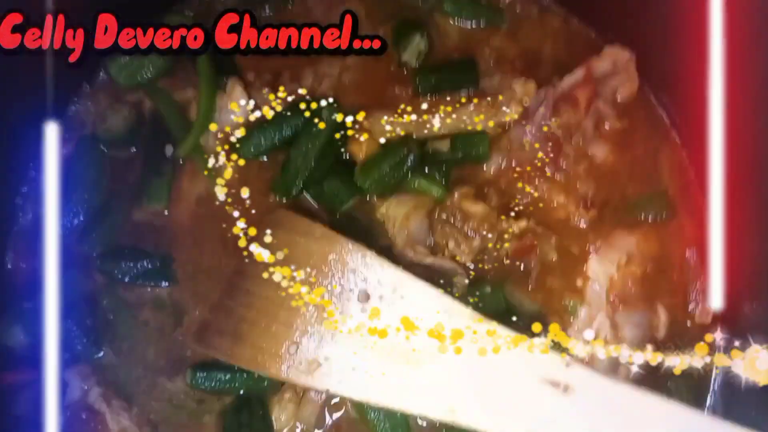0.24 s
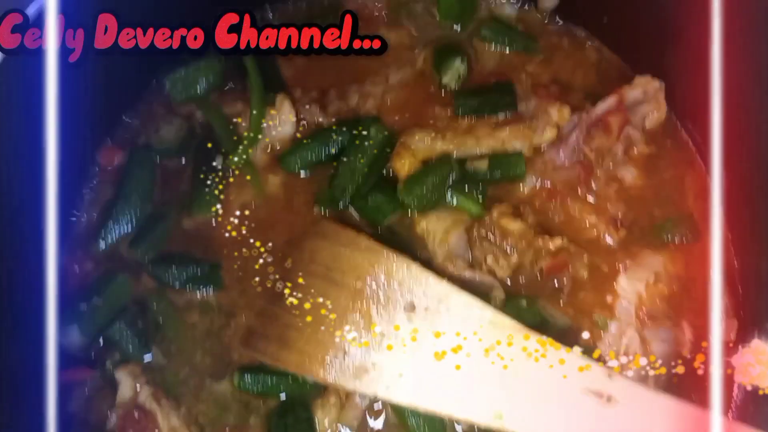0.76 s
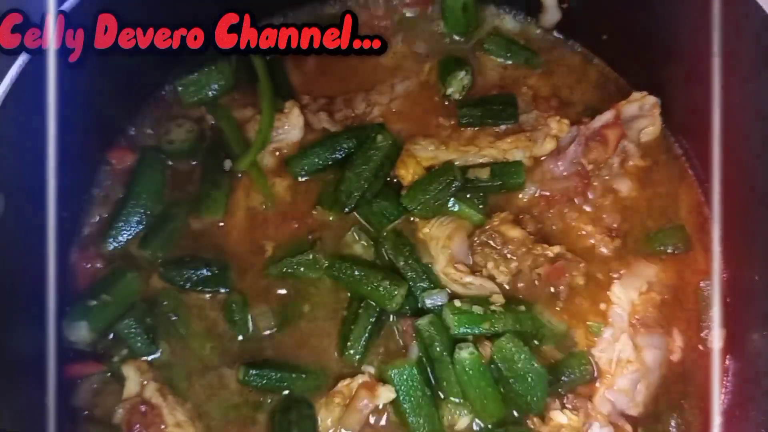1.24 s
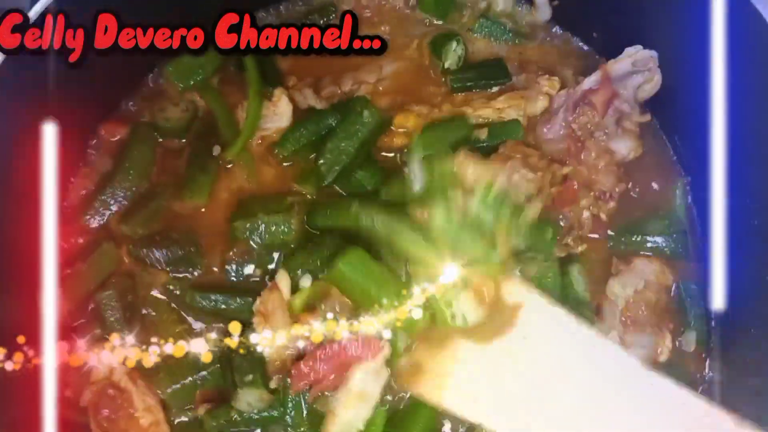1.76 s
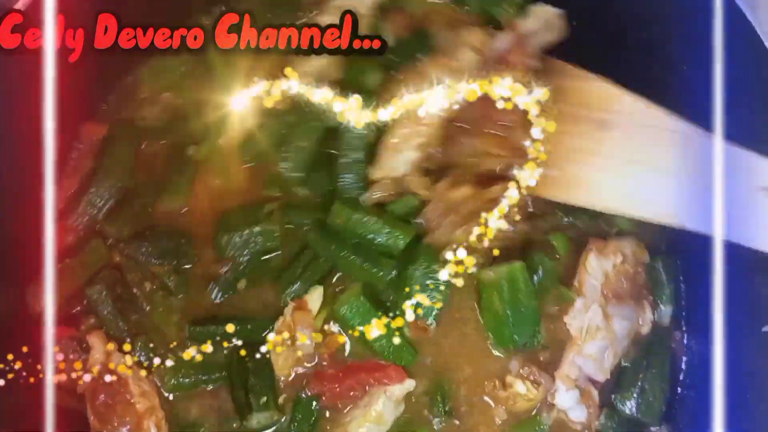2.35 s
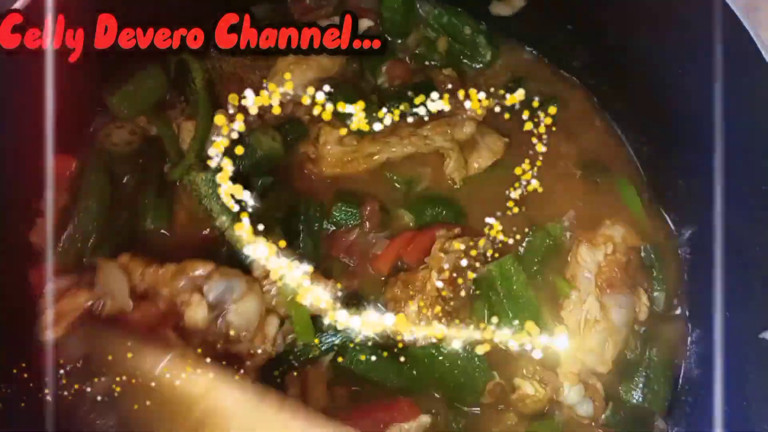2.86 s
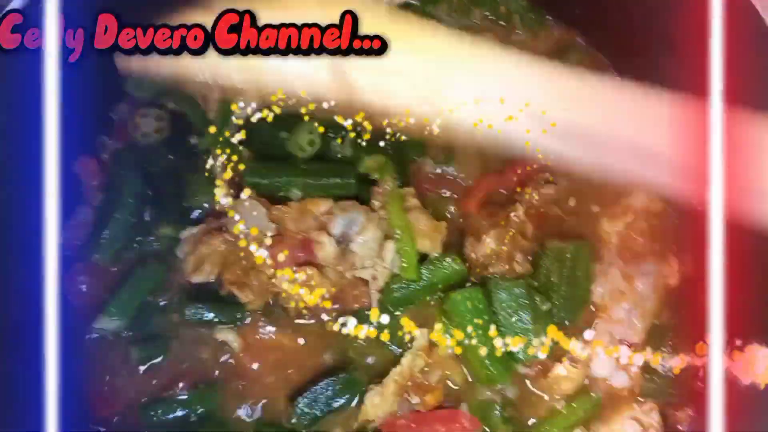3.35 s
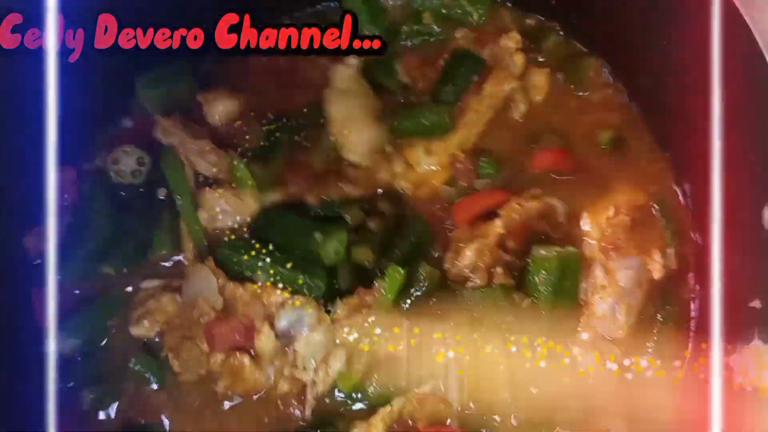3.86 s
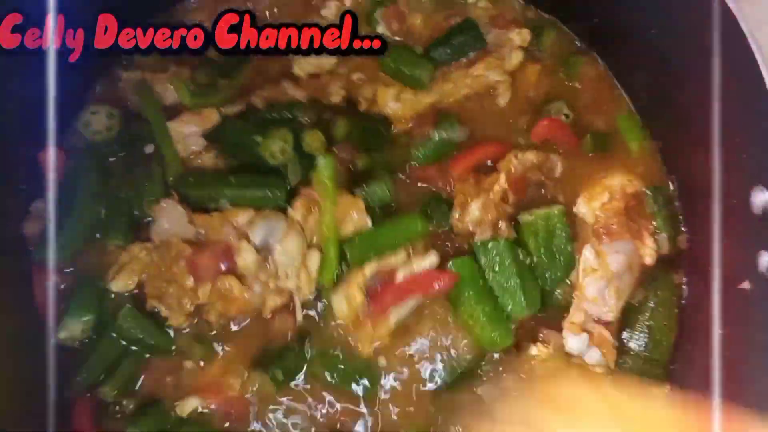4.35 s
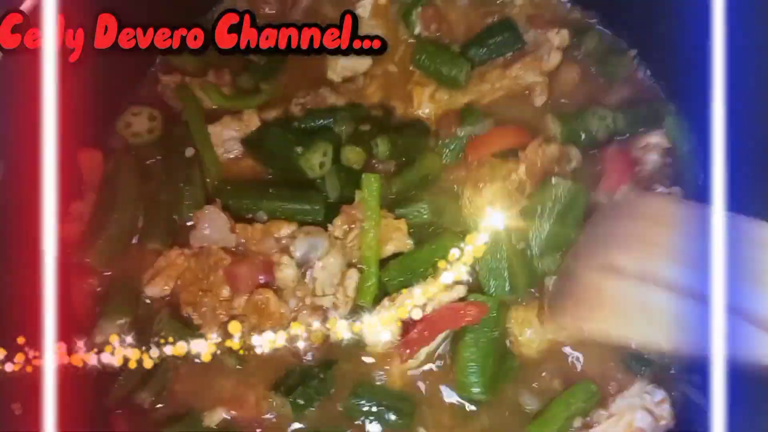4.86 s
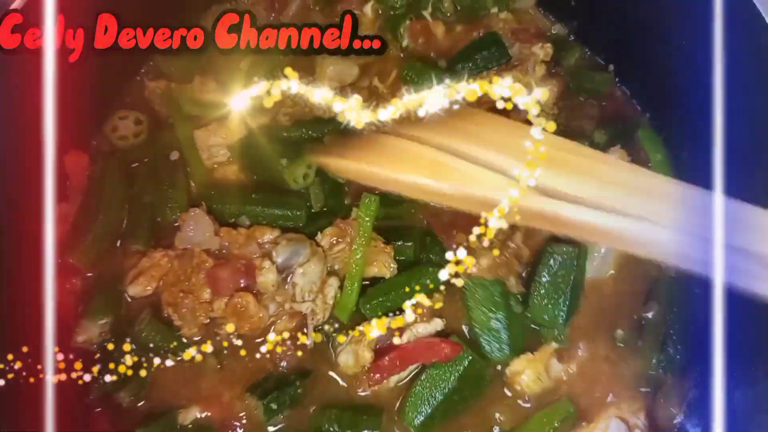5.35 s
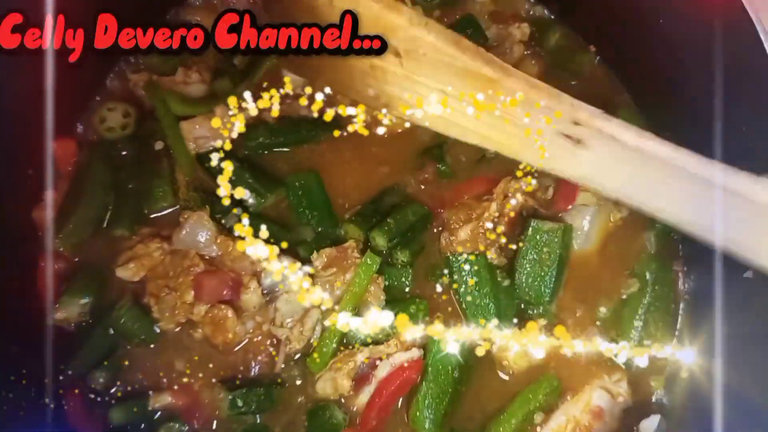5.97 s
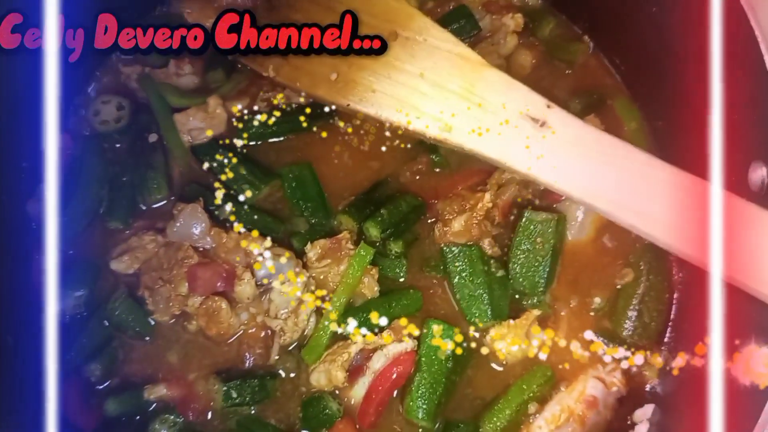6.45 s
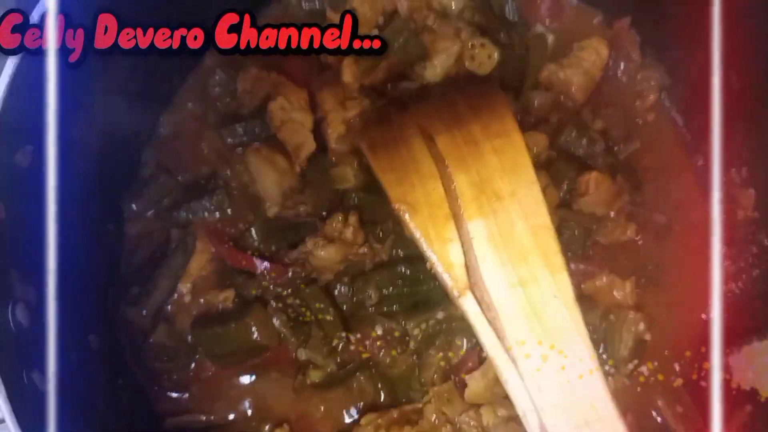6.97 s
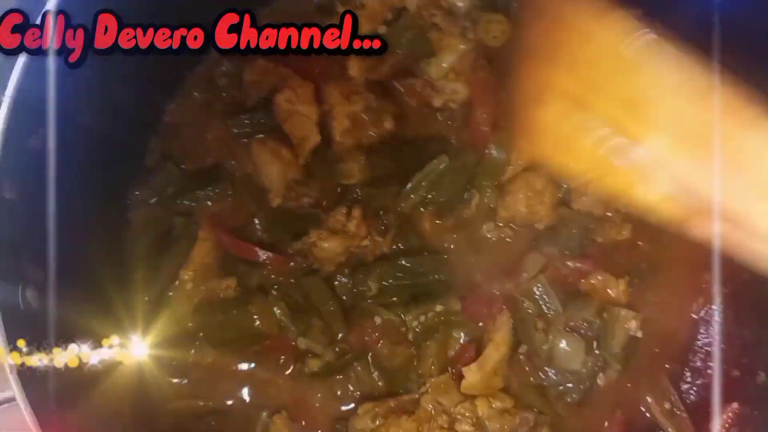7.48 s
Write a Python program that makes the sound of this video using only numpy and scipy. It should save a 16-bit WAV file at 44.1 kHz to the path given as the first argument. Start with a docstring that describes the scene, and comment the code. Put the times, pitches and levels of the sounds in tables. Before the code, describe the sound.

Wooden blade against a metal pot: dry, short knocks and brief rubbing drags, loudest early on, softer single taps midway and another cluster later. Faint simmer, fizz and swelling low hum continue beneath, with little sauce pops. After a momentary silence, a fuller bubbling, sizzling boil follows without strong knocks. Close microphone, slightly dull treble, short room tail.

```python
"""A wooden spatula knocks and drags on the wall of a metal pot of stew: blows ring the pot's modes as damped
sines with a contact noise and a short kitchen tail, and drags are rubbing noise through broadened modes.
The sauce spits in pings and puffs; burner hiss with narrow resonances, a fizz and a wavering, swelling low hum
lie beneath. Near the end the sound is cut briefly and fades back in on a harder boil of noise and bubble grains,
with faint, thin high flickers at the times of the late spits."""
import sys
import numpy as np
from scipy import signal
from scipy.fft import rfft, irfft, next_fast_len
from scipy.io import wavfile
from scipy.ndimage import uniform_filter1d, map_coordinates

SR = 44100
rng = np.random.default_rng(int(sys.argv[2]) if len(sys.argv) > 2 else 0)


def bounce(signal):
    """Save signal as a 16-bit WAV file at the path given by the first command-line argument."""
    frames = np.transpose(np.atleast_2d(signal))
    limited = np.clip(frames, -1, 1)
    pcm = np.round(limited * 32767).astype(np.int16)
    wavfile.write(sys.argv[1], SR, pcm)


N = 340452

# Blows, as a spectral tilt that weights modes and contact noise: (time [s], level at centre [dB],
# centre [Hz], loss below [dB/octave], loss above [dB/octave], ringing freedom [factor on t60],
# second emphasis level [dB], second emphasis centre [Hz])
BLOW_EVENTS = [(0.5303, -56.5, 2250, 0.1, 11, 0.56, -53, 516),
               (1.3828, -22.5, 2290, 4.5, 16.8, 0.35, -33, 940),
               (1.4214, -33, 450, 6.7, 6.5, 0.31, -42, 4200), (1.438, -45, 800, 22, 22, 0.47, -55, 290),
               (1.6569, -56, 750, 15, 17, 0.33, -60, 290), (2.0124, -51, 2770, 49, 35, 1.8, -74, 5100),
               (2.053, -28.5, 2090, 22.4, 34, 0.36, -35.5, 6320),
               (2.1334, -33.5, 1280, 0.1, 9.9, 0.25, -19, 396),
               (2.1363, -22, 2240, 17, 13.6, 0.4, -22, 767), (2.514, -33, 725, 31, 15.7, 0.61, -49.5, 2280),
               (2.73, -50.5, 1630, 26, 35, 0.74, -70, 2250), (2.7543, -54.5, 1420, 24, 21, 1.2, -68, 2250),
               (4.131, -41.5, 290, 0.1, 20, 1.1, -53, 520), (4.549, -30.5, 570, 17.6, 8.4, 0.93, -28, 1170),
               (4.691, -42, 288, 0.1, 31, 0.3, -65, 597), (6.155, -39, 1220, 0.1, 10.6, 0.94, -29.5, 645),
               (6.1947, -43.5, 700, 15, 17, 1.4, -68, 4500), (6.221, -31, 3760, 0.11, 45, 0.89, -24, 673),
               (6.2672, -32.5, 666, 56, 13, 0.48, -52, 4260),
               (6.8493, -70, 1316, 1.8, 12.6, 0.3, -55.5, 288)]
# Modes of pot wall and spatula blade: (frequency [Hz], relative level [dB], t60 at freedom 1 [s])
POT_MODES = [(295.8, -13, 0.15), (310.6, -6, 0.3), (420, -7.5, 0.042), (475, -11, 0.2), (520, 0.5, 0.08),
             (624, -1, 0.06), (697, -1, 0.056), (839, -10.5, 0.11), (877, -27, 0.021), (1096, -9.5, 0.12),
             (1260, -8.5, 0.043), (1517, -10, 0.11), (1640, -13.5, 0.038), (2118, 7.5, 0.042),
             (2247, 10.5, 0.023), (2500, -2.5, 0.064), (2790, -13, 0.32), (3210, -5, 0.031),
             (3320, -10, 0.061), (3590, -13, 0.12), (3650, -0.5, 0.065), (4316, 2, 0.051),
             (4448, 12, 0.065), (4990, 9, 0.035), (5680, 5, 0.077), (6460, -6, 0.12), (7020, 5, 0.059)]
# Drags of the blade; a row whose end lies before its build-up is silent: (time of firmest contact [s],
# level [dB], build-up [s], fade [dB/s], high band relative to low [dB], time of end [s])
DRAG_EVENTS = [(0.546, -61.5, 0.27, 213, -10, 0.84), (1.39, -39.5, .004, 170, -11, 1.66),
               (2.059, -60, .004, 220, -2, 2.12), (2.149, -45.5, .004, 236.5, -6.5, 1.9),
               (3.59, -60.5, .03, 150, -5.5, 3.63), (4.576, -51.5, .02, 92.5, -4.5, 4.7),
               (4.875, -65.5, 0.0089, 78, -6, 5), (6.245, -44.5, 0.058, 156, -27, 6.43)]
# Sauce spits: (time [s], nominal ping level [dB], frequency [Hz])
SPIT_EVENTS = [(0.5012, -50, 3170), (1.6087, -59.5, 4850), (2.8527, -49, 5060), (3.0677, -52.5, 3500),
               (3.5938, -45.5, 4900), (3.9125, -58.5, 3020), (3.9707, -52.5, 5150), (4.0416, -62, 4200),
               (4.1902, -52, 2970), (4.687, -51.5, 4040), (4.8685, -53, 3990), (5.66, -60, 4220),
               (6.2994, -48, 3400), (6.404, -56.5, 4970), (6.4164, -56.5, 4930), (6.5775, -53.5, 4720),
               (6.953, -55.5, 3310), (7.001, -53.5, 4660), (7.051, -55, 5200), (7.144, -50.5, 5440),
               (7.2614, -56, 5640), (7.3355, -54, 3360), (7.4502, -52, 5630), (7.4764, -51, 5800),
               (7.584, -53, 4100)]
# Simmer levels: (time [s], hiss level [dB], fizz level [dB])
SIMMER_LEVELS = [(0.0, -62, -68), (1.03, -66, -72), (2.33, -63, -68.5), (2.56, -64.5, -70),
                 (5.92, -67, -74), (6.26, -62.5, -69), (6.58, -65.5, -71.5), (6.75, -67.5, -72)]
# Noise colours of burner hiss and of small bubbles: (frequency [Hz], relative level [dB])
HISS_SPECTRUM = [(88, -17), (150, 0), (260, -8.5), (382, -5), (444, -11), (516, -7.5), (769, -10.5),
                 (835, -10), (1390, -16.5), (2340, -9.5), (2880, -17), (4000, -27), (5200, -51),
                 (8800, -120)]
FIZZ_SPECTRUM = [(1760, -53.5), (3000, -7), (3290, -10), (3570, -4.5), (4200, 0), (4550, -6), (5040, 1.5),
                 (5950, -1.5), (7900, -8.5), (10300, 4.5), (17400, -120)]
# Resonances of the pot in the hiss: (frequency [Hz], full width at half amplitude [Hz], added gain [dB])
HISS_RIDGES = [(534, 6.1, 8), (821, 4.1, 15), (1560, 60, -2.5), (1776, 350, 0), (2084, 26, 5),
               (2040, 1.9, 3), (2331, 55, 5.5)]
# Noise colour of the low rumble in the hum: (frequency [Hz], relative level [dB])
HUM_SPECTRUM = [(15, -60), (25, -35.5), (48, -9.5), (80, -3), (98, -4), (119, 6), (161, -7.5), (202, -5),
                (260, -32), (340, -77), (570, -120)]
# Swells of the hum: (time of peak [s], peak tone level [dB], full width at 1/e [s])
HUM_SWELLS = [(0.123, -67, 0.18), (0.52, -58, 0.077), (0.675, -68, 0.15), (1.055, -59, .1),
              (1.403, -55, 0.086), (1.773, -60, 0.094), (2.1, -70, 0.055), (2.275, -61, 0.33),
              (2.803, -59, 0.13), (3.293, -69.5, .5), (3.84, -65, 0.19), (4.214, -59.5, 0.13),
              (4.59, -60, 0.089), (4.948, -62.5, 0.14), (5.138, -63, 0.049), (5.517, -63.5, 0.068),
              (6.011, -68, .2), (6.23, -58.5, 0.12), (6.378, -62.5, 0.2), (6.588, -62, 0.052)]
# Hard boil levels: (time [s], rumble level [dB], bubble level [dB], sizzle level [dB])
BOIL_LEVELS = [(6.82, -75.5, -76.5, -77), (6.9, -77.5, -76, -78.5), (6.98, -54, -62.5, -65.5),
               (7.16, -53.5, -56, -61.5), (7.25, -55, -62, -67.5), (7.38, -54.5, -55.5, -55),
               (7.47, -55.5, -63.5, -65), (7.56, -59.5, -65.5, -57), (7.67, -49.5, -61.5, -66.5),
               (7.72, -59, -60, -65.5)]
# Noise colours of the hard boil, low to high: (frequency [Hz], relative level [dB])
RUMBLE_SPECTRUM = [(18, -60), (30, -34), (80, -15), (105, -2), (140, 5), (174, -2.5), (400, -12.5),
                   (520, -64), (880, -120)]
BURBLE_SPECTRUM = [(180, -19.5), (300, -14), (742, -11.5), (809, -10.5), (1380, -20), (1590, -18),
                   (2000, -23.5), (2600, -88), (4400, -120)]
SIZZLE_SPECTRUM = [(820, -42), (1400, -28.5), (1620, -3), (1780, -16), (1860, -26), (2040, -17), (2210, -8),
                   (2770, -13.5), (3310, -4.5), (3940, -14), (5500, -8.5), (7900, -18.5), (10300, -7),
                   (17400, -120)]
# Decay of the room: (frequency [Hz], t60 [s])
KITCHEN_DECAY = [(200, 0.54), (1000, 0.16), (4000, 0.31), (9000, 0.22)]
# Treble roll-off of the microphone: (frequency [Hz], gain [dB])
MIC_RESPONSE = [(5500, 0), (7750, -4), (8050, -15), (9500, -26), (15000, -38)]
# Noise colour of the self-noise: (frequency [Hz], relative level [dB])
SELF_NOISE_SPECTRUM = [(6500, -12), (8300, 7), (9500, 3), (10500, 0), (13500, -1.5), (15000, 1.5)]

SELF_NOISE_DB, TOP_HZ = -97, 15750
CUT_START_S, CUT_END_S = 6.757, 6.82
FLICKER_HZ, FLICKER_UNDER_SPIT_DB = 9130, 13.5  # mean frequency; level below the spit's table level
SECOND_LOSS_DB_PER_OCTAVE = 33.5  # on both sides of a blow's second emphasis
DRAG_END_S = 0.011  # ramp at the end of a drag
PUSH, GRIT = 4.8, 0.97  # contact: one impulse of the blade and the noise around it


def amp(db):
    """Logarithmic level: amplitude gain of a level in dB."""
    return 10 ** (np.asarray(db) / 20)


def unit(x):
    """Mean-square normalisation: x at rms 1."""
    return x / np.sqrt(np.mean(x ** 2) + 1e-20)


def along(points, hz):
    """Logarithmic frequency scale: (frequency, value) points interpolated on it."""
    f, v = np.transpose(points)
    return np.interp(np.log(hz + 1), np.log(f + 1), v)


def curves(rows, outside=-140):
    """Piecewise-linear levels in dB: one curve per column, practically silent outside the table."""
    s, *columns = np.transpose(rows)
    return [np.interp(np.arange(N) / SR, s, c, outside, outside) for c in columns]


def filtered(x, response):
    """Linear filtering: the spectrum of x times a response of frequency."""
    m = next_fast_len(len(x) + 8192)
    return irfft(rfft(x, m) * response(np.fft.rfftfreq(m, 1 / SR)), m)[:len(x)]


def patchy(depth_db):
    """Modulated noise: white noise with time-frequency patches of random gain."""
    z = signal.stft(rng.standard_normal(N + 512), nperseg=512)[2]
    field = rng.standard_normal(z.shape)
    field = uniform_filter1d(field, size=6, axis=0)
    field = uniform_filter1d(field, size=10, axis=1)
    return signal.istft(z * amp(depth_db * unit(field)), nperseg=512)[1][:N]


def shaped(x, spectrum):
    """Spectral colouring: x weighted by a spectrum, rms 1."""
    return unit(filtered(x, lambda hz: amp(along(spectrum, hz))))


def grains(count, hz, spread, cycles, size_db):
    """Bubble oscillation: random damped sines whose pitch rises as if nearing the surface; rms 1."""
    when, pitch, size = rng.random(count), rng.standard_normal(count), rng.standard_normal(count)
    f = (hz * np.exp(spread * pitch))[:, None]
    u = f * np.arange(int(3 * cycles * SR / hz)) / SR / cycles  # age in units of `cycles` periods
    envelope = amp(size_db * size)[:, None] * u * np.exp(-3 * u)
    wave = envelope * np.sin(2 * np.pi * cycles * u * (1 + 0.2 * u / cycles))
    wave *= f < SR / 3
    at = (when * N).astype(int)[:, None] + np.arange(u.shape[1])
    return unit(np.bincount(at.ravel(), wave.ravel(), N)[:N])


def add_at(out, s, sound):
    """Superposition: adds a sound to out from time s."""
    out[round(s * SR):][:len(sound)] += sound


def hum():
    """Frequency and amplitude modulation: a wavering low tone swells unevenly over a steady rumble."""
    t = np.arange(N) / SR
    # random points 12 times a second, joined smoothly
    waver = map_coordinates(rng.standard_normal(N * 12 // SR + 4), [np.arange(N) * 12 / SR])
    tone = np.sqrt(2) * np.sin(2 * np.pi * np.cumsum(119 + 7 * waver) / SR)
    rumble = shaped(rng.standard_normal(N), HUM_SPECTRUM)
    swell = sum(amp(db) * np.exp(-(2 * (t - s) / length) ** 2) for s, db, length in HUM_SWELLS)
    steady = amp(-70.5) * shaped(patchy(depth_db=2.5), HUM_SPECTRUM)
    return (swell * (tone + .5 * rumble) + steady) * (t < CUT_END_S)


def simmer():
    """Resonance of flow noise: burner hiss with narrow ridges, and a fizz of small bubbles above it."""
    hiss_db, fizz_db = curves(SIMMER_LEVELS)
    ridges = lambda f: 1 + sum(amp(db) / (1 + ((f - c) / w * 2) ** 2) for c, w, db in HISS_RIDGES)
    hiss = unit(filtered(shaped(patchy(depth_db=1.5), HISS_SPECTRUM), ridges))
    crackle = grains(count=350, hz=6200, spread=.25, cycles=4, size_db=3)
    fizz = shaped(unit(patchy(depth_db=1.5)) + .2 * crackle, FIZZ_SPECTRUM)
    return amp(hiss_db) * hiss + amp(fizz_db) * fizz


def boil():
    """Superposed bubble oscillations: a rolling boil of rumble, dense burble and sizzle."""
    rumble_db, bubbles_db, sizzle_db = curves(BOIL_LEVELS)
    large_bubbles = grains(count=2000, hz=550, spread=.45, cycles=6, size_db=3)
    small_bubbles = grains(count=3000, hz=4500, spread=.4, cycles=20, size_db=3)
    rumble = shaped(patchy(depth_db=-1.5), RUMBLE_SPECTRUM)
    burble = shaped(unit(patchy(depth_db=1.5)) + .4 * large_bubbles, BURBLE_SPECTRUM)
    sizzle = shaped(unit(patchy(depth_db=2.1)) + .25 * small_bubbles, SIZZLE_SPECTRUM)
    return amp(rumble_db) * rumble + amp(bubbles_db) * burble + amp(sizzle_db) * sizzle


def high_flickers():
    """Damped oscillation: faint, thin high flickers at the times of the late spits."""
    out, t = np.zeros(N + SR), np.arange(SR // 20) / SR
    envelope = amp(-60 * t / .009) * (1 - np.exp(-t / .0005))
    for s, db, _ in SPIT_EVENTS:
        hz = FLICKER_HZ * (1 + .02 * rng.standard_normal())
        if s > CUT_END_S:
            add_at(out, s, amp(db - FLICKER_UNDER_SPIT_DB) * envelope * np.sin(2 * np.pi * hz * t))
    return out[:N]


def spits():
    """Impulsive excitation: each spit is a rapidly damped ping with a longer puff of band noise."""
    out, t = np.zeros(N + SR), np.arange(SR // 20) / SR
    onset = 1 - np.exp(-t / 0.00074)
    for s, db, hz in SPIT_EVENTS:
        puff = filtered(rng.standard_normal(len(t)), lambda f: 1 / (1 + ((f - hz) / 1500) ** 4))
        puff = 0.62 * unit(puff) * amp(-60 * t / 0.045)
        ping = np.sin(2 * np.pi * hz * t) * amp(-60 * t / 0.017)
        add_at(out, s, amp(db) * (ping + puff) * onset)
    return out[:N]


def wall_response(f):
    """Modal response: a direct path plus the pot's modes, broadened by the blade that damps them."""
    width = 1j * f * 120  # damping broadens every mode to 120 Hz
    modes = sum((-1) ** k * amp(db) * width / (c * c - f * f + width)
                for k, (c, db, _) in enumerate(POT_MODES))
    return 0.83 + modes


def drag():
    """Friction excitation: rubbing noise, part of it through the damped pot modes, in two bands."""
    scrapes = grains(count=6000, hz=4060, spread=0.53, cycles=1.0, size_db=2.0)
    rub = filtered(patchy(depth_db=-2.0) + 0.63 * scrapes, wall_response)
    low = unit(filtered(rub, lambda f: 1 / (1 + (f / 1600) ** 3)))
    high = unit(rub) + 1.6 * patchy(depth_db=2.1)
    high = unit(filtered(high, lambda f: 1 / (1 + ((f - 5300) / 1150) ** 6)))
    out, t = np.zeros(N), np.arange(N) / SR
    for s, db, rise, fade_db, bright_db, end in DRAG_EVENTS:
        fade = amp(db - fade_db * np.maximum(t - s, 0))
        contact = np.clip(np.minimum(1 + (t - s) / rise, (end - t) / DRAG_END_S), 0, 1) ** 2
        out += fade * contact * (low + amp(bright_db) * high)
    return out


def kitchen(x):
    """Diffuse reverberation: a fresh noise tail, delayed 250 samples; each frequency dies at its own speed."""
    hz, t, z = signal.stft(rng.standard_normal(SR // 2), SR, nperseg=256)
    decay = amp(-60 * t / along(KITCHEN_DECAY, hz)[:, None])
    tail = signal.istft(z * decay, SR, nperseg=256)[1]
    return signal.fftconvolve(np.pad(x, (250, 0)), tail / np.linalg.norm(tail))


def contact_noise(t, tilt):
    """Impact force: a single push within decaying noise, coloured by the tilt of the blow."""
    crack = np.pad(GRIT * amp(-60 * t / .013) * rng.standard_normal(len(t)), (64, 0))
    crack[64 + 36] += PUSH  # 36 samples after the noise begins
    return filtered(crack, lambda f: amp(tilt(f)))[64:]


def blows():
    """Modal excitation: each blow rings the same modes; where and how hard it lands sets their balance."""
    out, t = np.zeros(N + SR), np.arange(SR // 4) / SR
    hz, level, t60 = np.transpose(POT_MODES)[:, :, None]
    octaves = lambda f, c: np.log2(np.clip(f, 290, 9000) / c)
    for s, db, centre_hz, below_db, above_db, free, second_db, second_hz in BLOW_EVENTS:
        def tilt(f):
            """Spectral envelope: the stronger of a broad and a narrow peak, in dB."""
            slope = np.where(f < centre_hz, below_db, -above_db)
            broad = db + slope * octaves(f, centre_hz)
            narrow = second_db - SECOND_LOSS_DB_PER_OCTAVE * abs(octaves(f, second_hz))
            return np.maximum(broad, narrow)

        # small random changes of level, frequency and phase in each mode
        luck = rng.uniform(-1, 1, (3, len(POT_MODES), 1))
        phase = 2 * np.pi * hz * (1 + .008 * luck[1]) * t + .6 * luck[2]
        decay_db = 60 * t / (t60 * np.clip(free, .2, 3))
        ring = amp(level + tilt(hz) + 2 * luck[0] - decay_db) * np.sin(phase)
        hit = ring.sum(axis=0) + amp(21) * contact_noise(t, tilt)
        hit *= 1 - np.exp(-t / 0.0007)
        add_at(out, s, hit)
        add_at(out, s, amp(-15) * kitchen(hit))
    return out[:N]


def scene():
    """Superposition: contacts lose deep bass; all but the high flickers pass the microphone's roll-off."""
    contacts = filtered(blows() + drag() + spits(), lambda f: f ** 4 / (f ** 4 + 190 ** 4))
    body = contacts + simmer() + hum() + boil()
    return (filtered(body, lambda f: amp(along(MIC_RESPONSE, f))) + high_flickers())[None]


def record(dry):
    """Noise floor and band limit: self-noise is added, then a short cut to silence and a sharp low-pass."""
    t = np.arange(N) / SR
    x = dry[0] + amp(SELF_NOISE_DB) * shaped(rng.standard_normal(N), SELF_NOISE_SPECTRUM)
    # 3 ms fade-out before the cut, 14 ms fade-in after it
    gate = np.clip(np.maximum((CUT_START_S - t) / .003, (t - CUT_END_S) / 0.014), 0, 1)
    return filtered(x * gate, lambda hz: hz < TOP_HZ)[None]


dry = scene()
out = record(dry)
bounce(out)
```